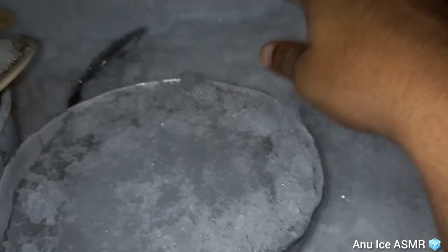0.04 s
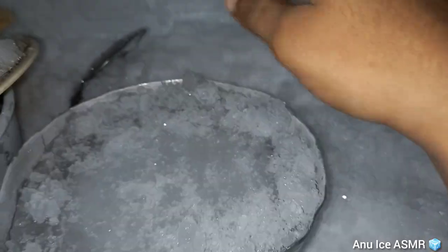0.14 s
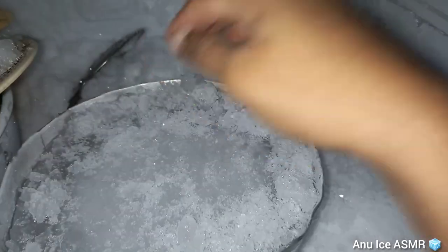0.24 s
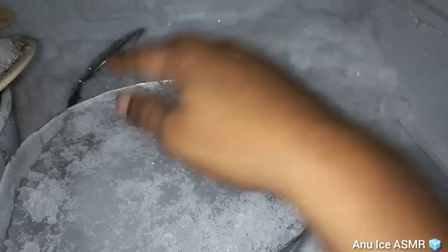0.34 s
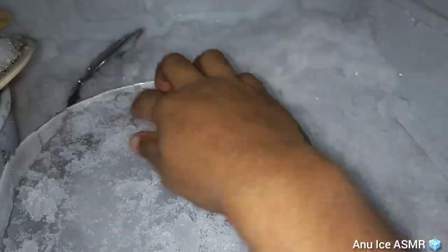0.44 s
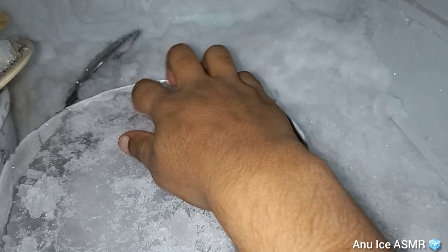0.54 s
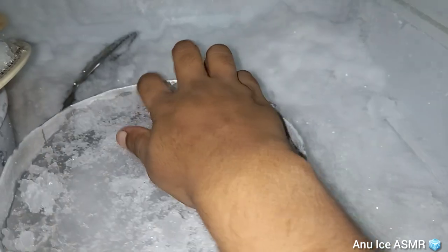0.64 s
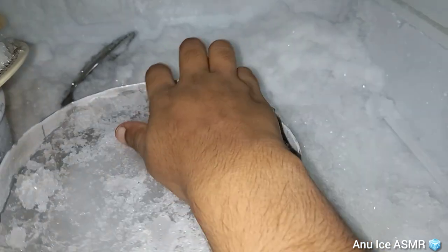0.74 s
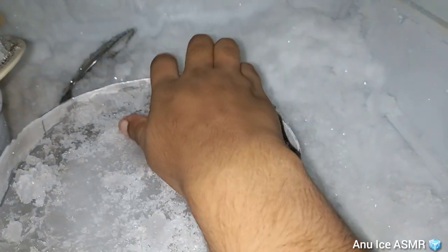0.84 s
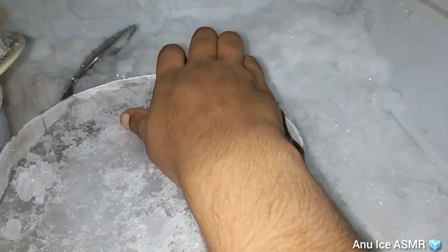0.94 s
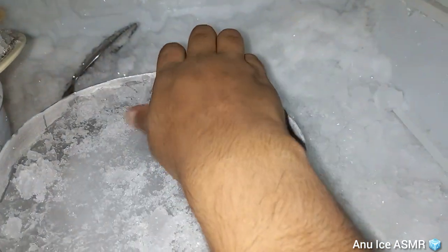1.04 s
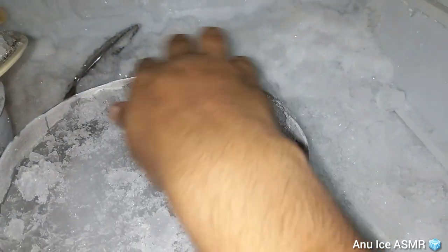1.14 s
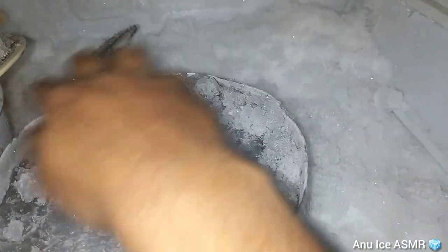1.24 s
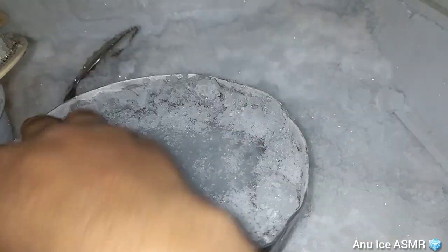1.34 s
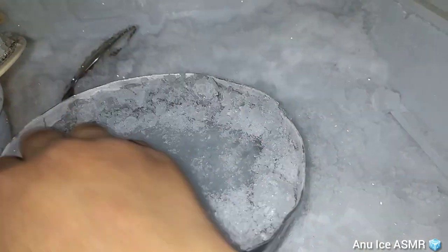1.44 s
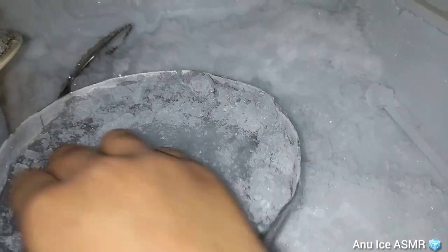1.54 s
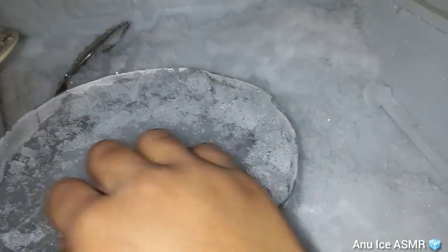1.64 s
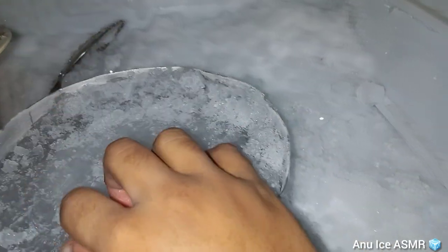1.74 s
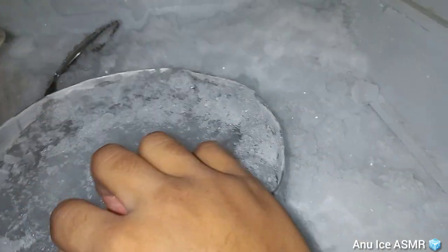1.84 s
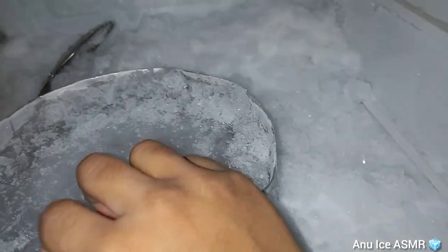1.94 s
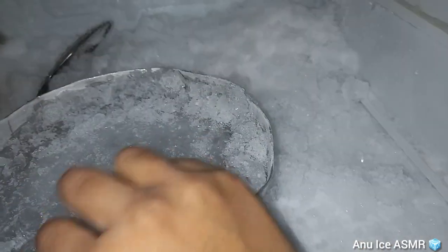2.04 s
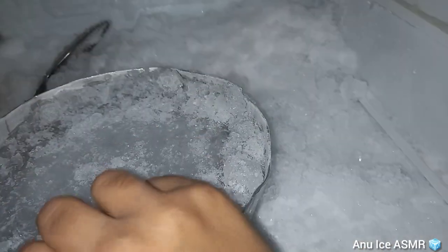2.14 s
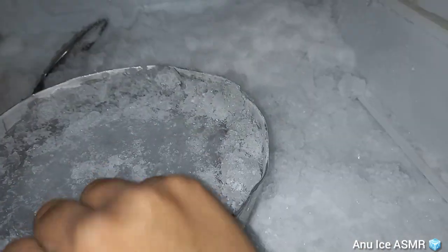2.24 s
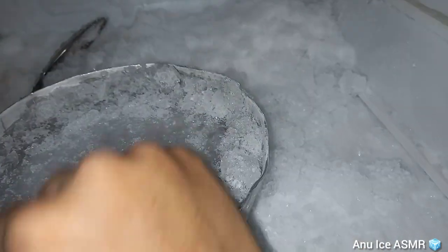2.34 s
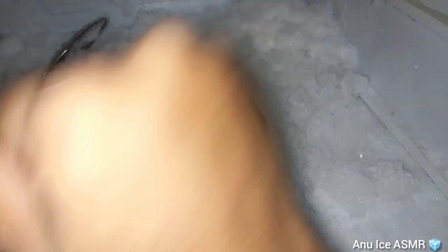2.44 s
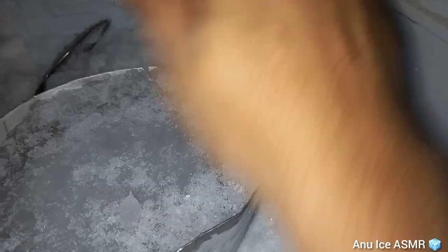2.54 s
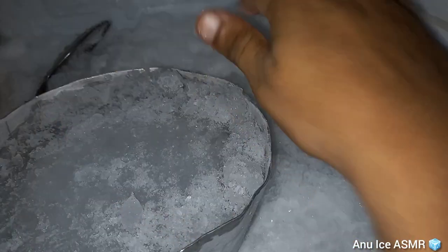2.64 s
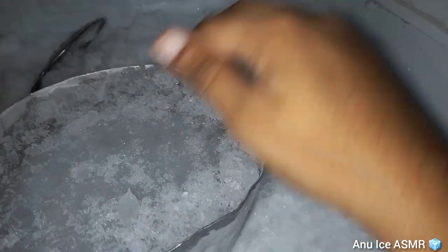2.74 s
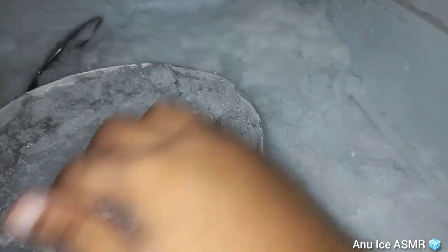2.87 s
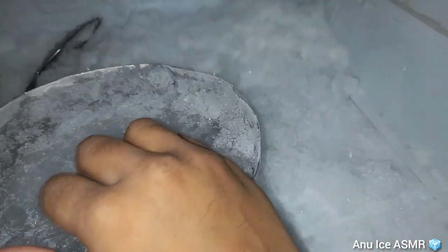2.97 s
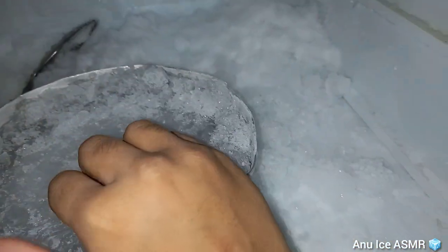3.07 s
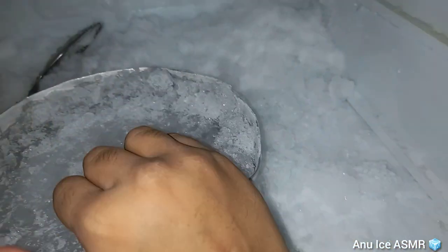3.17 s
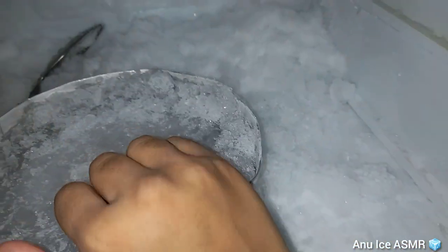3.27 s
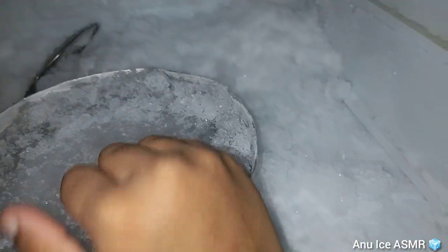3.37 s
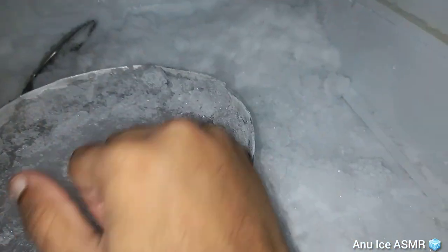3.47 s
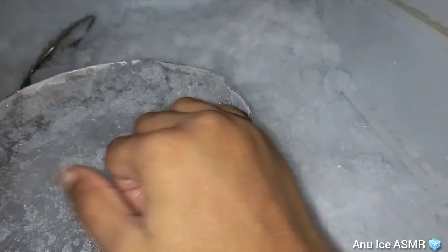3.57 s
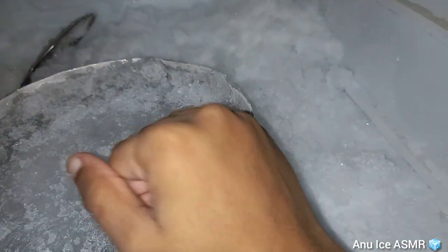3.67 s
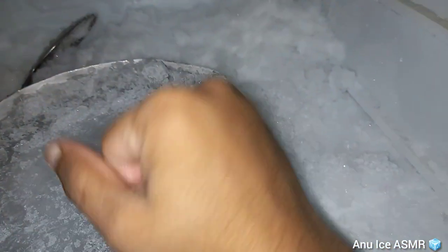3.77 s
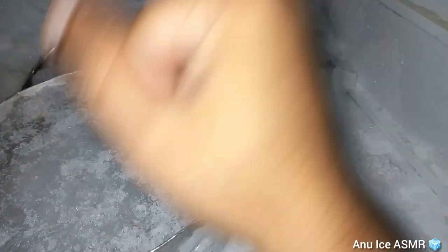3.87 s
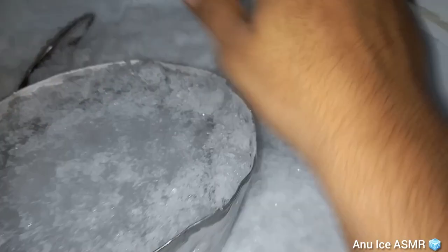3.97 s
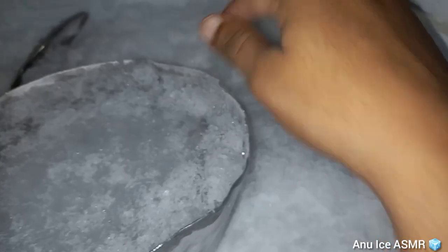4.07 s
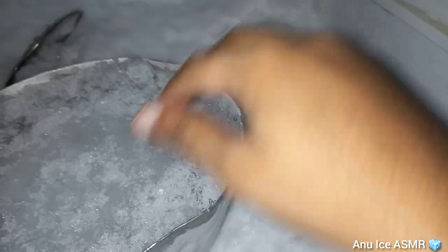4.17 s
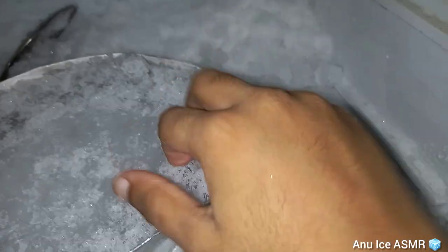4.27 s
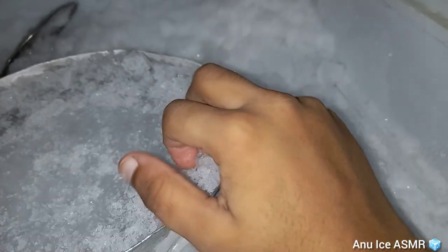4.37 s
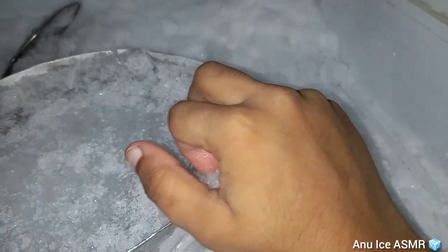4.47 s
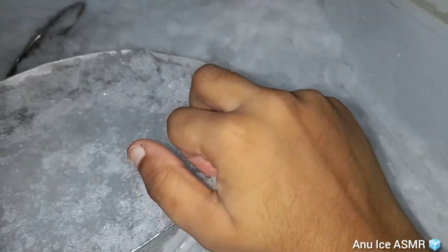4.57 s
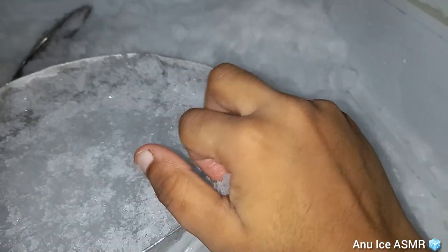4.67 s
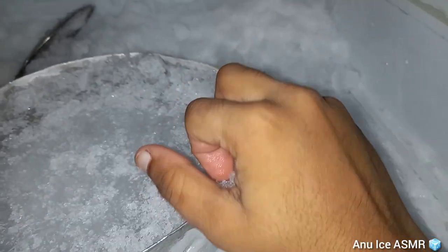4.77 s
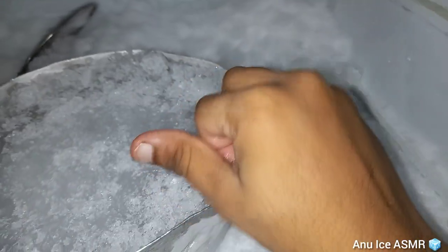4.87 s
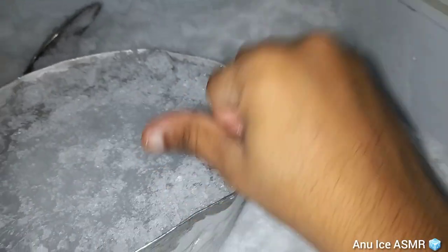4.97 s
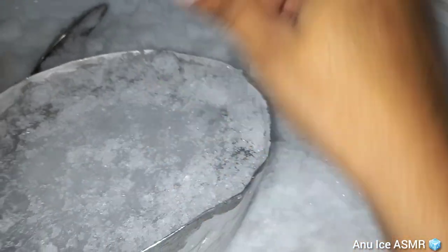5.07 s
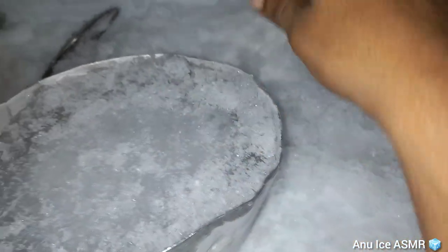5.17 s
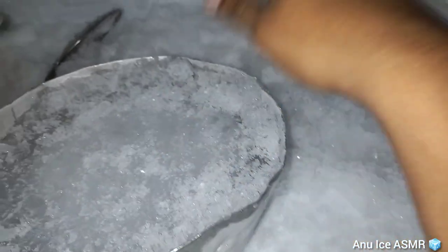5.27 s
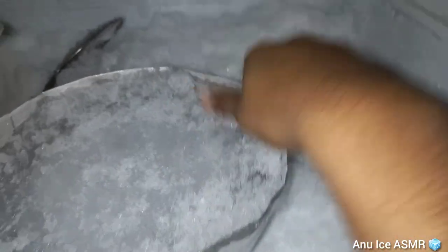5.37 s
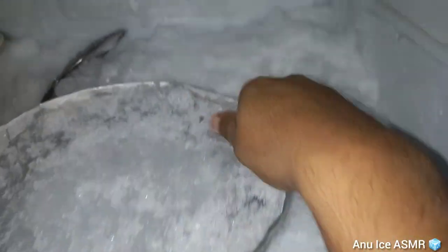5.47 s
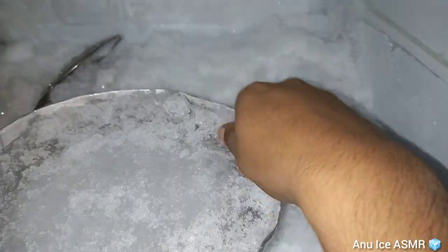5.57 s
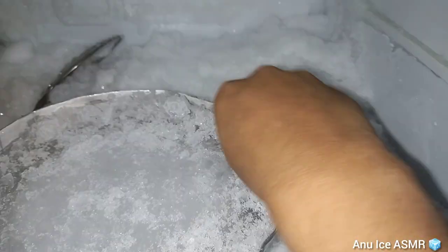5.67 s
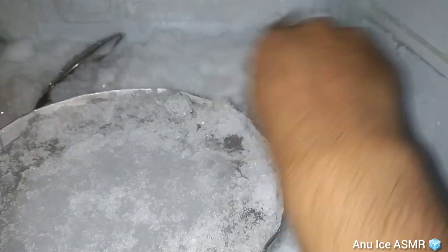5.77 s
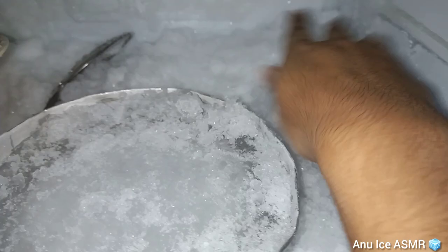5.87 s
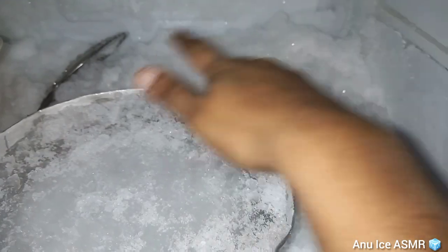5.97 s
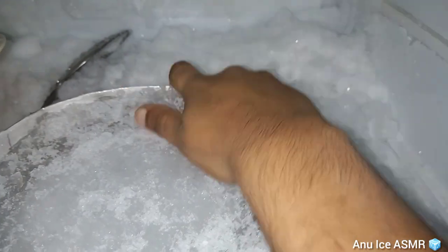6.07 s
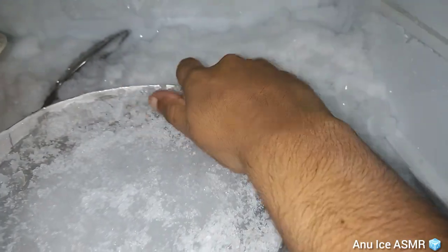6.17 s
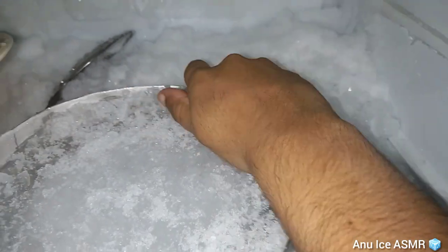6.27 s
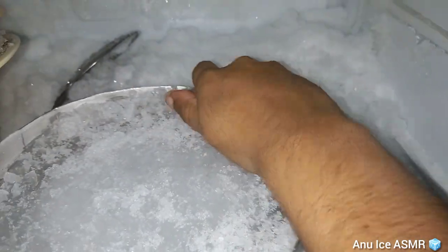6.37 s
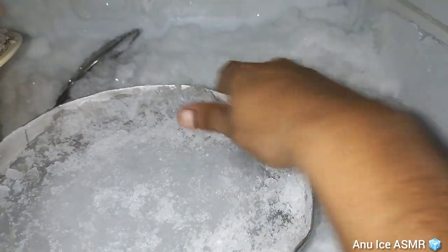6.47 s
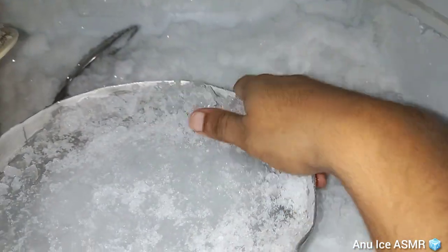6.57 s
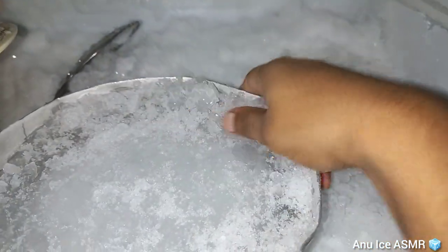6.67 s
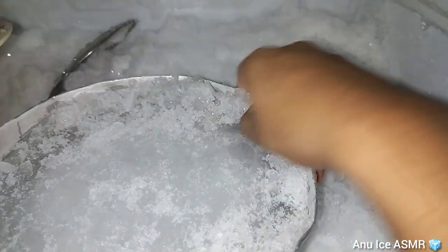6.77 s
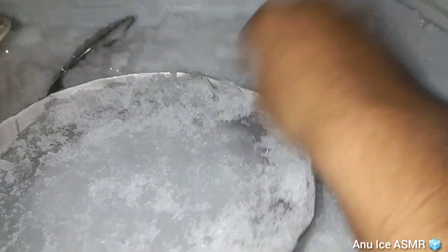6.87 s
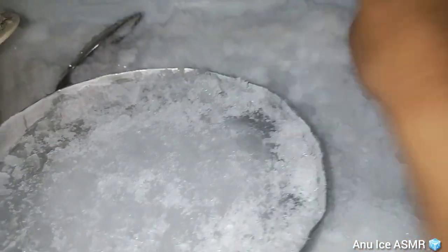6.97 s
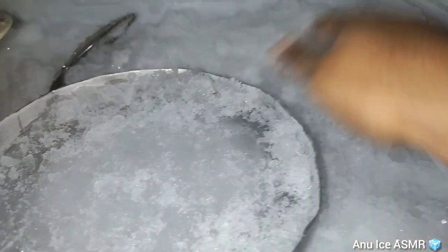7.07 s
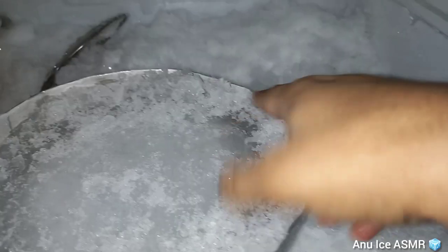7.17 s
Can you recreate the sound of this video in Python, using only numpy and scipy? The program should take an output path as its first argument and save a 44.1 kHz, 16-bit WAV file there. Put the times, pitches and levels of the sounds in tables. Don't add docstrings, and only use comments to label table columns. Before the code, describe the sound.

Fingernails scrape and crush crunchy frost on a thin metal bowl inside a humming freezer, with sharp snaps and hollow booming pushes.

```python
import sys
import numpy as np
from scipy import signal
from scipy.fft import rfft, irfft, next_fast_len
from scipy.io import wavfile
from scipy.ndimage import map_coordinates

SR = 44100
rng = np.random.default_rng(int(sys.argv[2]) if len(sys.argv) > 2 else 0)


def attenuation_scalar(level_db):
    decades = np.asarray(level_db, float) / 20
    return 10 ** decades


def master(y):
    cut = np.clip(np.atleast_2d(y).T, -1, 1)
    pcm = np.round(cut * 32767)
    wavfile.write(sys.argv[1], SR, pcm.astype(np.int16))


N = 318402


def unit(x):
    return x / np.sqrt(np.mean(x ** 2) + 1e-20)


def along(points, hz):
    f, v = np.transpose(points)
    return np.interp(np.log(hz + 1), np.log(f + 1), v)


def filtered(x, response):
    n = x.shape[-1]
    m = next_fast_len(n + 2048)
    return irfft(rfft(x, m) * response(np.fft.rfftfreq(m, 1 / SR)), m)[..., :n]


def modes(table):
    def response(f):
        total = 0
        for k, (hz, width, db) in enumerate(table):
            total = total + (-1) ** k * attenuation_scalar(db) * 1j * f * width / (hz * hz - f * f + 1j * f * width)
        return total
    return response


def above(f, edge_hz):
    return 1 / np.sqrt(1 + (edge_hz / (f + 1)) ** 12)


def wobble(rate_hz):
    knots = rng.standard_normal(int(N * rate_hz / SR) + 4)
    return map_coordinates(knots, [np.arange(N) * rate_hz / SR])


# (frequency [Hz], level [dB per Hz])
UNIT_HUM = [(18, -77), (30, -38), (59, -11), (78, -53), (97, -1.5), (150, -16), (167, -44), (466, -20),
            (1100, -26.5), (1430, -28.5), (2420, -120)]
# (frequency [Hz], level [dB per Hz])
FAN_HISS = [(1250, -25), (1800, -30.5), (2500, -35.5), (3500, -42.5), (6500, -50.5), (8300, -40),
            (10000, -47), (16000, -53)]
# (frequency [Hz], width [Hz], level [dB])
UNIT_MODES = [(217, 115, 5.5), (311.3, 88, 9.5), (468, 80, 2), (949, 42, 0.5)]
# (frequency [Hz], correlation [0-1])
PORT_LIKENESS = [(60, 0.94), (130, 0.97), (200, 0.22), (290, 0.18), (640, 0.43), (1400, 0.017)]
# (frequency [Hz], level [dB rms])
MOTOR = (43, -64)


def cooling_unit():
    def mid_side(f):
        turn = np.arccos(np.clip(along(PORT_LIKENESS, f), -1, 1)) / 2
        colour = attenuation_scalar(along(UNIT_HUM[:-1] + FAN_HISS, f)) * (1 + np.abs(modes(UNIT_MODES)(f)) ** 2)
        return colour * [np.cos(turn), np.sin(turn)]

    mid, side = filtered(rng.standard_normal((2, N)), mid_side)
    hum = attenuation_scalar(-40 + 0.38 * wobble(2.186)) * unit(np.array([mid + side, mid - side]))
    motor_hz, motor_db = MOTOR
    phase = 2 * np.pi * motor_hz * np.arange(N) / SR + 0.5 * wobble(2.7)
    motor = attenuation_scalar(motor_db + 3.5 + wobble(4.9)) * np.sin(phase)
    return hum + attenuation_scalar([[2.5], [-2.5]]) * motor


# (frequency [Hz], peak [dB], t60 [s])
LAST_RING = (473, -33, 0.66)


def bowl_ring():
    hz, peak_db, t60_s = LAST_RING
    note = unit(filtered(rng.standard_normal(N), lambda f: modes([(hz, 60, 0)])(f) ** 2))
    return attenuation_scalar(peak_db - 3.5 - 60 * np.arange(N) / SR / t60_s) * note


# (time [s], length [s], hiss at start [dB], hiss at end [dB], bowl rasp [dB])
DRAGS = [(0.086, 0.21, -32, -63, -44), (0.401, 0.43, -48.5, -34.5, -58), (0.564, 0.22, -35, -36.5, -30),
         (0.785, 0.12, -45, -47, -46), (0.93, 0.24, -55, -52, -62), (1.347, 0.51, -48.5, -44.5, -46),
         (1.765, 0.18, -48, -34.5, -40), (1.992, 0.33, -35, -42.5, -46), (2.65, 0.21, -58, -55, -52.5),
         (2.929, 0.24, -51, -44, -43), (3.249, 0.17, -52, -41, -46.5), (3.433, 0.39, -45.5, -49, -47.5),
         (3.78, 0.4, -71, -46.5, -51), (4.233, 0.32, -41, -47.5, -48.5), (4.665, 0.1, -48, -26, -43.5),
         (4.798, 0.17, -40.5, -57.5, -49), (5.166, 0.19, -49, -58, -54), (5.397, 0.328, -46.5, -32, -45.5),
         (5.91, 0.099, -56, -46, -44.5), (6.063, 0.15, -29.5, -39, -39.5), (6.22, 0.2, -41, -52, -48.5),
         (6.379, 0.1, -39, -34, -36.5), (6.505, 0.22, -40.5, -41.5, -46), (6.743, 0.046, -30, -29, -36),
         (6.795, 0.13, -55, -54, -43.5), (6.916, 0.42, -52, -71, -52)]
# (time [s], level [dB])
WEIGHT = [(0, -44), (.55, -39.5), (.75, -25), (1.25, -40.5), (1.4, -30.5), (2.25, -26.5), (2.6, -41.5),
          (3.04, -38), (3.75, -32.5), (4.42, -34.5), (4.58, -38), (4.76, -32.5), (5.36, -36), (5.7, -28),
          (6.03, -42.5), (6.43, -34), (6.82, -30.5), (7.22, -42)]
LAND_DB_PER_S, LIFT_DB_PER_S = 2800, 802
HOVER_DB = -3


def drags():
    t = np.arange(0, N + 64, 64) / SR
    s, length, start_db, end_db, rasp_db = np.transpose(DRAGS)[..., None]
    landing_db = -LAND_DB_PER_S * np.maximum(s - t, 0)
    lifting_db = -LIFT_DB_PER_S * np.maximum(t - s - length, 0)
    touch = attenuation_scalar(landing_db + lifting_db)
    slide = attenuation_scalar(start_db + (end_db - start_db) * np.clip((t - s) / length, 0, 1))
    hiss = (touch * slide).max(axis=0)
    rasp = (touch * attenuation_scalar(rasp_db)).max(axis=0)
    weight = attenuation_scalar(np.interp(t, *np.transpose(WEIGHT))) * np.maximum(touch.max(axis=0), attenuation_scalar(HOVER_DB))
    return [np.interp(np.arange(N) / SR, t, gain) for gain in (hiss, rasp, weight)]


# (time [s], peak [dB], frequency [Hz], t60 [s])
PUSHES = [(0.09, -28, 126, 0.19), (0.601, -12.5, 126.7, 0.25), (0.747, -18.5, 143, 0.069),
          (.821, -17.5, 123.5, 0.28), (1.361, -18.5, 114, 0.082), (1.486, -12, 129.4, 0.086),
          (1.544, -12, 138.6, 0.097), (1.687, -14, 125, 0.13), (1.725, -25, 120, 0.14),
          (1.822, -16, 114.7, 0.082), (1.923, -25.5, 131, 0.19), (2.085, -28.5, 110, 0.33),
          (2.167, -14.5, 129.7, 0.23), (2.23, -21.5, 128.2, 0.25), (2.41, -35, 127, 0.42),
          (2.933, -10, 122, 0.13), (3.007, -13, 130, 0.11), (3.135, -20.5, 130.7, 0.21),
          (3.247, -26, 113, 0.26), (3.36, -19, 114.6, 0.22), (3.616, -24.5, 108, 0.17),
          (3.746, -18.5, 107, 0.13), (3.793, -24.5, 123, 0.26), (3.857, -20, 100.2, 0.44),
          (4.29, -22.5, 123, 0.31), (4.341, -19.5, 122.6, 0.3), (4.508, -22, 128, 0.11),
          (4.655, -26.5, 117, 0.27), (4.79, -25, 119.5, 0.16), (5.155, -27, 108, 0.17),
          (5.5, -26, 130.5, 0.63), (6.076, -16, 126.5, 0.14), (6.184, -17, 121.7, 0.13),
          (6.434, -15, 131.2, 0.29), (6.571, -28.5, 136.7, 0.39), (6.774, -18, 124, 0.096),
          (6.82, -20.5, 121, 0.082), (6.915, -18.5, 130.5, 0.094)]
# (frequency [Hz], width [Hz], level [dB])
CHEST_MODES = [(84.6, 38, -9), (126.6, 19.7, 0.5), (167.4, 34.7, -8), (262.6, 28.7, -8.5)]


def chest():
    booms, t = np.zeros(N + SR), np.arange(SR // 2) / SR
    for s, peak_db, hz, t60_s in PUSHES:
        build = (1 - np.exp(-t / 0.0073)) ** 2
        shape = attenuation_scalar(-60 * t / np.clip(t60_s, 0.04, 0.5)) * build
        start = round((s - 0.006) * SR)
        booms[start:][:len(t)] += attenuation_scalar(peak_db + 10.5) * shape * np.sin(2 * np.pi * hz * t)
    rumble = unit(filtered(rng.standard_normal(N), lambda f: modes(CHEST_MODES)(f) ** 2))
    rumble = attenuation_scalar(1.0) * drags()[2] * rumble
    return filtered(booms[:N] + rumble, lambda f: (1j * f / (75 + 1j * f)) ** 2)


# (time [s], level [dB], length [s])
THUDS = [(0.085, -35.5, 0.045), (0.802, -32, 0.028), (0.418, -36, 0.033), (0.605, -36, 0.082),
         (1.367, -36.5, 0.067), (1.556, -36.5, 0.12), (1.816, -36.5, 0.084), (2.155, -33.5, 0.091),
         (3.042, -30.5, 0.028), (3.117, -30.5, 0.12), (3.359, -37, 0.04), (3.565, -43.5, 0.27),
         (4.27, -36, .04), (4.336, -34, 0.19), (5.496, -43, 0.052), (5.637, -48, 0.064), (6.099, -34, 0.12),
         (6.426, -25.5, 0.062), (6.578, -35.5, 0.056), (6.745, -37, 0.13)]
# (frequency [Hz], width [Hz], level [dB])
THUD_MODES = [(186, 93, 7), (358, 276, 2)]


def thuds():
    t = np.arange(N) / SR
    shape = np.zeros(N)
    for s, db, length in THUDS:
        loss_db = np.where(t < s, 1500 * (s - t), 12 * (t - s) / length)
        shape += attenuation_scalar(db - loss_db)
    return shape * unit(filtered(rng.standard_normal(N), lambda f: modes(THUD_MODES)(f) ** 2))


def crystals(size, spread_db):
    strength_db = spread_db * np.minimum(rng.exponential(size=size), 4)
    return unit(rng.standard_normal(size) * attenuation_scalar(strength_db))


# (frequency [Hz], level [dB per Hz])
FROST = [(1470, -1), (2500, 1), (3060, 3.5), (3440, -4), (4240, -0.5), (5780, -1.5), (6300, -4), (7890, -4),
         (15200, -1.5), (16000, -8)]
# (frequency [Hz], width [Hz], level [dB])
CRUST_MODES = [(4250, 420, -0.5), (5400, 1500, -3.5), (7400, 670, -1.5), (8020, 2700, 1), (10900, 350, -5),
               (12500, 1900, 0)]


def frost_colour(f):
    lift = sum(np.abs(modes([mode])(f)) ** 2 for mode in CRUST_MODES)
    return attenuation_scalar(along(FROST, f)) * (1 + lift)


# (frequency [Hz], width [Hz], level [dB])
BOWL_MODES = [(259.4, 26.5, 14.5), (481, 50, 11.5), (884, 144, -2.5), (1360, 350, -0.5), (2365, 900, -4),
              (2560, 285, 4), (3090, 2100, -12)]


def bowl(f):
    return modes(BOWL_MODES)(f)


def scraping():
    hiss_gain, rasp_gain, _ = drags()
    jerks_db = 2 * wobble(40) + 3.2 * wobble(300)
    hiss = filtered(crystals(N, spread_db=2.5), lambda f: frost_colour(f) * (attenuation_scalar(-4) + above(f, 3550)))
    rasp = filtered(crystals(N, spread_db=4), bowl)
    hiss = unit(attenuation_scalar(jerks_db) * hiss)
    rasp = unit(attenuation_scalar(0.2 * jerks_db) * rasp)
    return attenuation_scalar(-1.0) * hiss_gain * hiss + rasp_gain * rasp


RING_DB, DRY_RING_DB = 11, 18.5


def split(length_s, rise_share):
    return rise_share * length_s, (1 - rise_share) * length_s


# (time [s], level [dB], ring [Hz], length [s])
POWDER = [(0.039, -47, 3040, 0.071), (1.637, -45, 3500, 0.41), (2.379, -25, 2930, 0.017),
          (2.36, -39, 3100, 0.026), (3.677, -32.5, 2900, 0.05), (3.678, -37, 4230, 0.083),
          (3.753, -28, 4120, 0.02), (3.756, -30.5, 3020, 0.034), (4.255, -34.5, 4330, 0.019),
          (5.422, -29.5, 7400, 0.016), (5.44, -27.5, 5700, 0.012), (5.489, -22.5, 5840, 0.012),
          (5.5, -22, 5300, 0.016), (5.563, -35, 5400, .018), (5.588, -25, 5300, 0.016),
          (5.692, -32.5, 7500, 0.067), (5.688, -30, 5700, 0.05), (5.797, -54.5, 5760, 0.08),
          (6.934, -47, 5700, 0.06)]


def powder():
    return [(s, db, -68, hz, DRY_RING_DB, *split(length, 0.51)) for s, db, hz, length in POWDER]


# (time [s], level [dB], ring [Hz])
TICKS = [(0.1754, -37, 8740), (0.583, -30, 5000), (0.901, -30, 7600), (0.975, -34, 10000),
         (1.008, -46, 7040), (1.09, -39.5, 2760), (1.1344, -38, 7570), (1.153, -32.5, 2010),
         (1.1635, -30.5, 7600), (1.362, -51, 7500), (1.404, -39, 9000), (1.428, -44, 9000),
         (1.492, -40, 9300), (1.528, -45, 14000), (1.5464, -37, 4130), (1.615, -41, 12000),
         (1.931, -48, 4920), (2.038, -42, 8950), (2.0954, -27.5, 7000), (2.153, -38, 9000),
         (2.203, -25.5, 4300), (2.252, -33.5, 8610), (2.31, -48, 8900), (2.53, -52, 10000),
         (2.66, -47, 9500), (2.716, -32.5, 8340), (2.768, -40.5, 8700), (2.925, -40, 3000),
         (3.142, -36, 3000), (3.33, -52, 8000), (3.3697, -32, 12700), (3.468, -37.5, 8550),
         (3.5941, -28, 4100), (4.038, -35.5, 12200), (4.051, -48, 8500), (4.165, -41, 12100),
         (4.243, -45, 4500), (4.279, -35, 4130), (5.216, -44, 9000), (5.2925, -38.5, 8200),
         (5.376, -47, 9000), (5.432, -28, 7600), (5.83, -51, 5800), (5.911, -43, 9100), (5.934, -27, 9200),
         (5.976, -52, 10000), (5.995, -38.5, 12100), (6.185, -27, 10900), (6.195, -26, 7600),
         (6.212, -30, 7600), (6.315, -34, 4150), (6.57, -30, 12740), (6.775, -23, 6700),
         (6.8273, -30, 8800), (6.934, -37, 14600), (7.001, -36.5, 14200), (7.024, -41.5, 3720),
         (7.072, -48, 3800)]


def ticks():
    rise_s, fall_s, knock_db = 0.0053, 0.0049, -23
    return [(s, db, knock_db, hz, RING_DB, rise_s, fall_s) for s, db, hz in TICKS]


# (time [s], level [dB], ring [Hz], length [s])
CRUNCHES = [(0.419, -37, 8040, 0.018), (1.446, -45.5, 8440, 0.077), (1.673, -37.5, 8850, 0.023),
            (1.804, -38, 12500, 0.015), (2.064, -31, 9400, 0.023), (2.12, -35.5, 4320, 0.11),
            (2.226, -25.5, 4660, 0.017), (3.017, -37, 8750, 0.032), (3.074, -40, 15200, 0.012),
            (3.348, -38, 9000, 0.02), (3.374, -35, 4200, 0.022), (3.51, -44, 8300, 0.01),
            (3.404, -32, 2500, 0.021), (3.552, -42, 8460, 0.037), (3.618, -41.5, 4400, 0.047),
            (3.624, -36, 8200, 0.054), (3.729, -31.5, 8200, 0.058), (3.747, -31, 8800, 0.023),
            (3.786, -41, 8200, 0.013), (4.316, -47, 8200, 0.01), (4.352, -44, 8200, 0.008),
            (4.333, -37, 8000, 0.013), (4.384, -34.5, 4100, 0.012), (4.747, -40, 7340, 0.022),
            (4.839, -27, 3900, 0.02), (4.856, -32.5, 4130, 0.024), (5.322, -41.5, 12600, 0.032),
            (6.18, -35.5, 7600, 0.045), (6.25, -37, 12500, 0.013), (6.292, -48, 9000, 0.0071),
            (6.323, -36, 8000, 0.01), (6.34, -43, 8000, 0.008), (6.35, -40, 4470, 0.008),
            (6.495, -38, 8500, 0.022), (6.536, -41, 12500, 0.012), (6.59, -37, 8000, 0.012),
            (6.609, -39, 12500, 0.012), (6.688, -40, 7200, 0.07), (6.858, -29, 7500, 0.02),
            (6.875, -25, 6900, 0.028)]


def crunches():
    return [(s, db, -16, hz, RING_DB, *split(length, 0.51)) for s, db, hz, length in CRUNCHES]


# (time [s], level [dB], bowl knock [dB], length [s])
KNOCKS = [(0.536, -51, 10, 0.0089), (0.551, -47, 10.5, 0.027), (0.5887, -29.5, 21, 0.0077),
          (0.594, -34.5, 10.5, 0.023), (0.607, -34.5, 8.5, 0.015), (0.657, -42, 9, 0.012),
          (0.673, -29.5, 7.5, 0.0085), (0.618, -36, 4, 0.01), (0.726, -30.5, 4, 0.012),
          (0.731, -33, 6, 0.013), (0.755, -36, 7, 0.014), (0.743, -33, 11, 0.0063),
          (0.752, -31, -10, 0.022), (0.798, -41.5, 8, 0.02), (1.786, -48.5, 12, 0.017),
          (1.813, -55, 11, 0.0086), (1.834, -48, 16, 0.02), (1.8605, -32.5, 9.5, 0.01),
          (1.885, -41, -2, 0.03), (1.894, -45, 17, 0.0091), (3.054, -43, 4, 0.015),
          (6.262, -40.5, -2.5, 0.02), (6.39, -33, 7.5, 0.0069), (6.4, -41, 4, 0.011),
          (6.421, -34.5, 12, 0.015), (6.409, -44, 8, 0.006), (6.428, -35, 8, 0.0077),
          (6.43, -37, 9, 0.0091), (6.443, -31.5, 5, 0.012), (6.45, -38, 6, 0.0066), (6.458, -33, 8, 0.018),
          (6.469, -39, 9.5, 0.011), (6.595, -40, -5, 0.0075), (6.743, -40.5, 13, 0.0062),
          (6.753, -37.5, 3, 0.021), (6.797, -44.5, 10.5, 0.0097), (6.861, -36, 6.5, 0.0076),
          (6.897, -47.5, 6, 0.012)]


def knocks():
    ring_hz = 2680
    return [(s, db, knock_db, ring_hz, RING_DB, *split(length, 0.57)) for s, db, knock_db, length in KNOCKS]


# (time [s], level [dB], ring [Hz], bowl knock [dB])
CRACKS = [(0.072, -19.5, 7300, -43), (0.0797, -6.5, 7350, -66), (0.085, -14.5, 5400, -76),
          (0.1043, -28, 12800, -11), (0.113, -33, 9600, -19), (0.514, -27.5, 13800, -29),
          (0.556, -22.5, 7200, -16), (0.65, -21, 7400, -30), (0.802, -15, 12900, -17),
          (0.806, -21, 7800, -20), (0.8098, -28, 8200, 3), (0.85, -25, 7000, -30), (1.730, -23, 6700, -17),
          (1.738, -21, 6700, -19), (2.014, -27.5, 14300, -29), (2.168, -21, 7400, -16.5),
          (2.6857, -18, 13400, -26), (3.1132, -18.5, 9000, -14), (3.121, -28.5, 8600, -5.5),
          (3.238, -27, 7900, -4.5), (3.241, -43, 4000, -6), (4.1081, -27, 14100, -13),
          (4.4543, -14, 5240, -23), (4.458, -11.5, 8100, -22), (4.4647, -21, 7900, -32),
          (4.501, -22.5, 4430, -47), (4.64, -10, 5040, -16), (4.643, -19.5, 4630, -24),
          (4.7028, -21, 7400, -22), (5.245, -26, 11700, -13), (5.54, -21.5, 5630, -67),
          (5.644, -21.5, 5000, -70), (5.684, -20, 7600, -35), (5.735, -24, 7860, -42),
          (5.923, -27, 10000, -36), (6.067, -39, 9000, 10), (6.358, -26.5, 8000, -22),
          (6.6414, -18, 15000, -19), (6.7576, -20.5, 5500, -42), (6.7893, -19, 5560, -56),
          (6.789, -24, 12100, -30), (7.212, -28, 3100, -26), (7.214, -25.5, 5000, -30)]


def cracks():
    rise_s, fall_s = 0.00331, 0.0052
    return [(s, db, knock_db, hz, RING_DB, rise_s, fall_s) for s, db, hz, knock_db in CRACKS]


def snaps():
    breaks = cracks() + ticks() + crunches() + powder() + knocks()
    s, db, knock_db, ring_hz, ring_db, rise, fall = np.transpose(breaks)[..., None]
    lead = SR // 16
    t = np.arange(-lead, lead) / SR
    before = -t / np.maximum(rise - 0.003, 0.0003)
    after = t / np.maximum(fall - 0.0015, 0.001)
    away = np.where(t < 0, before, after)
    burst = crystals((len(s), len(t)), spread_db=2.5) * attenuation_scalar(-7 * np.abs(away) ** 1.18)

    edge_hz = ring_hz * (0.45 - 0.004 * knock_db)

    def shard(f):
        ring = modes([(ring_hz, 500, ring_db)])(f)
        return (above(f, edge_hz) + attenuation_scalar(-15)) * (frost_colour(f) + ring)

    def nail_on_bowl(f):
        return bowl(f) * (1j * f / (1090 + 1j * f)) ** 2

    def size(x):
        return np.linalg.norm(x, axis=1, keepdims=True)

    crack = filtered(burst, shard)
    knock = filtered(burst, nail_on_bowl)
    mix = crack / size(crack) + attenuation_scalar(knock_db + 3.0) * knock / size(knock)
    both = attenuation_scalar(db + 0.5) * size(burst) * mix
    at = (np.round(s * SR) + np.arange(len(t))).astype(int)
    return np.bincount(at.ravel(), both.ravel(), N + SR)[lead:lead + N]


def walls(x, direct_db, t60_s):
    step, size, lead = SR // 70, 3072, 64
    t = np.arange(SR // 30) / SR
    starts = np.arange(0, N + step, step)[:, None]
    window = np.sqrt(np.hanning(2 * step + 1)[:-1])
    pieces = np.pad(x, (step, 2 * step))[starts + np.arange(2 * step)] * window

    echo = rng.standard_normal((2, len(starts), len(t))) * attenuation_scalar(-60 * t / t60_s)
    echo /= np.linalg.norm(echo, axis=2, keepdims=True)
    direct_at = rng.integers(0, 16, size=echo.shape[:2])
    echo[[[0], [1]], np.arange(len(starts)), direct_at] += attenuation_scalar(direct_db)

    paths = rfft(np.pad(echo, ((0, 0), (0, 0), (lead, 0))), size)
    paths /= np.abs(paths) ** 1.14
    late_s = ((np.arange(size) + size // 2) % size - size // 2 - 60) / SR
    fade_db = np.where(late_s < 0, -8 + 1500 * late_s, -1200 * np.maximum(late_s - 0.012, 0))
    paths = rfft(irfft(paths, size) * attenuation_scalar(fade_db), size)

    heard = irfft(rfft(pieces, size) * paths, size)
    at = (starts + np.arange(size)).ravel()
    return np.array([np.bincount(at, port.ravel())[step + lead:][:N] for port in heard])


def scene():
    background = cooling_unit() + bowl_ring() + chest() + thuds()
    frost = walls(snaps() + scraping(), direct_db=2, t60_s=0.038)
    return background + attenuation_scalar(-1.5) * frost


def band_limit(x):
    return signal.sosfilt(signal.butter(12, 16990, fs=SR, output="sos"), x)


# (frequency [Hz], left minus right [dB])
PORT_BALANCE = [(300, 0), (2000, -1), (5000, -1), (7300, 0), (8500, -8), (11000, -5), (14000, 1)]


def record(dry):
    ports = filtered(dry, lambda f: attenuation_scalar(along(PORT_BALANCE, f) * [[0.5], [-0.5]]))
    rounded = ports / (1 + np.abs(ports / 0.85) ** 4) ** (1 / 4)
    top_hz = 15900
    mix = filtered(rounded, lambda f: attenuation_scalar(-45 * (f > top_hz)))
    return band_limit(mix)


dry = scene()
out = record(dry)
master(out)
```